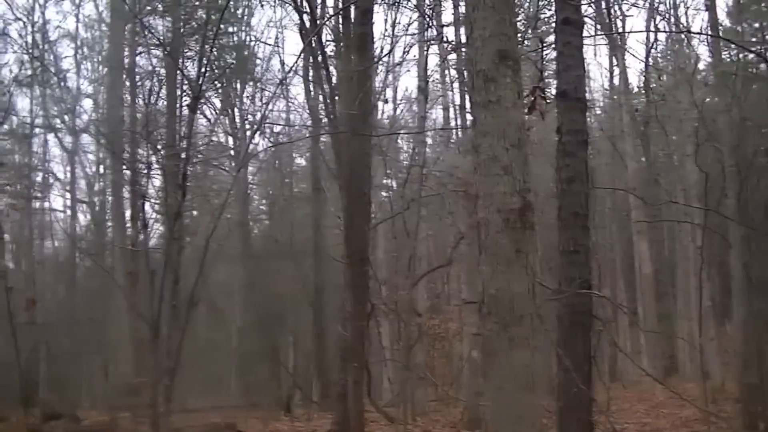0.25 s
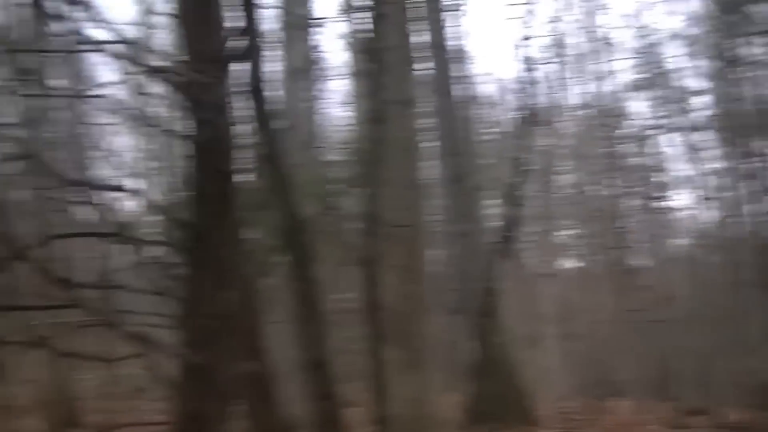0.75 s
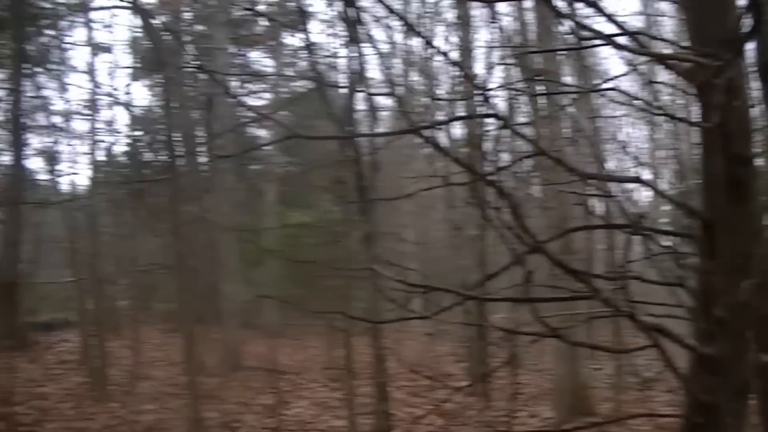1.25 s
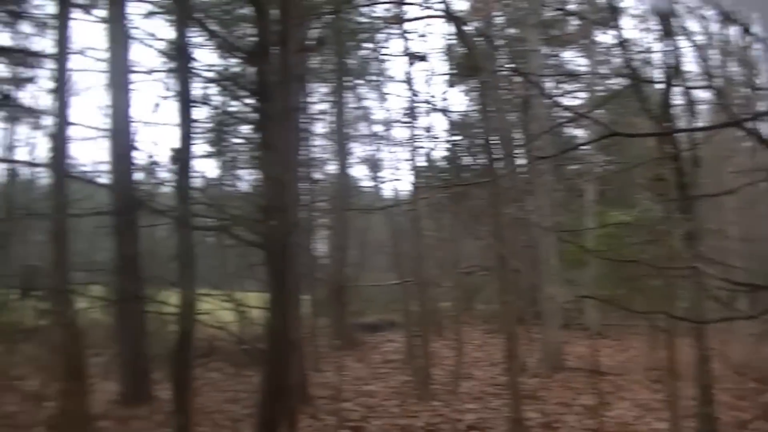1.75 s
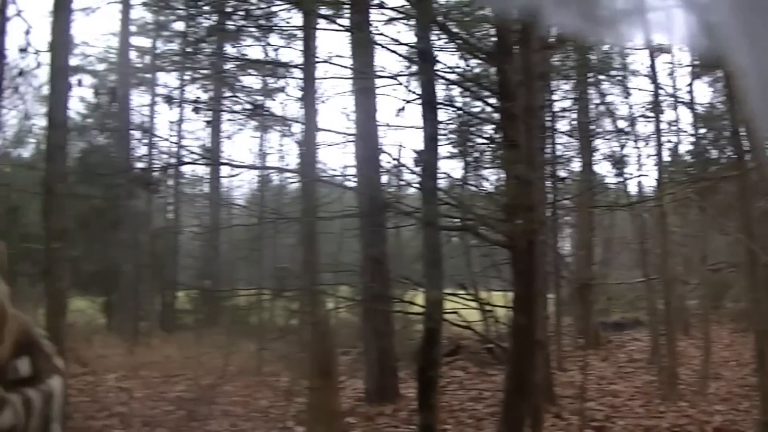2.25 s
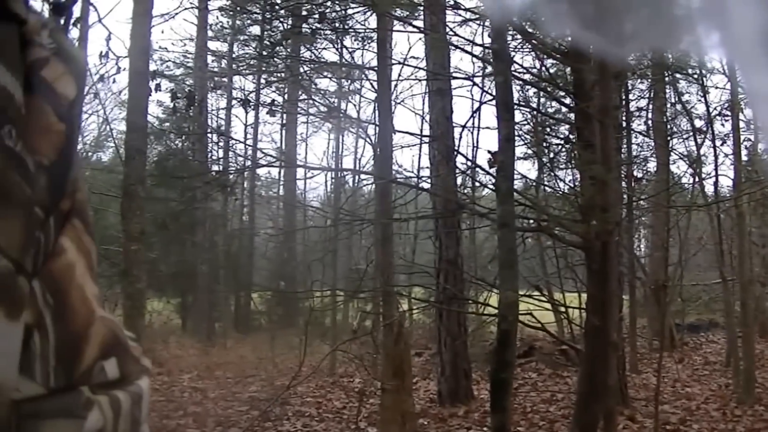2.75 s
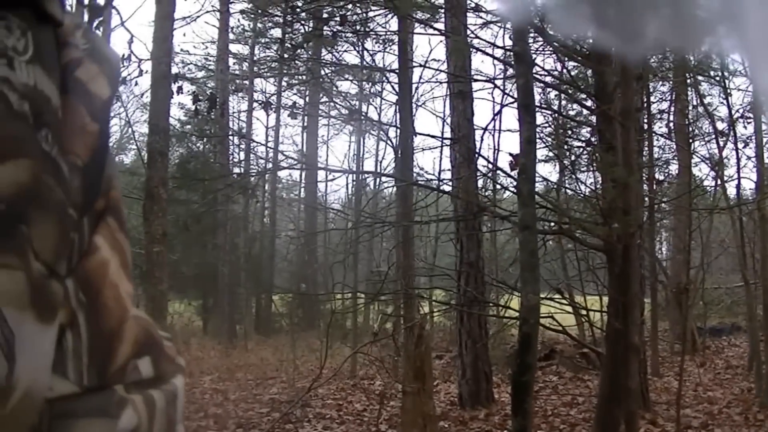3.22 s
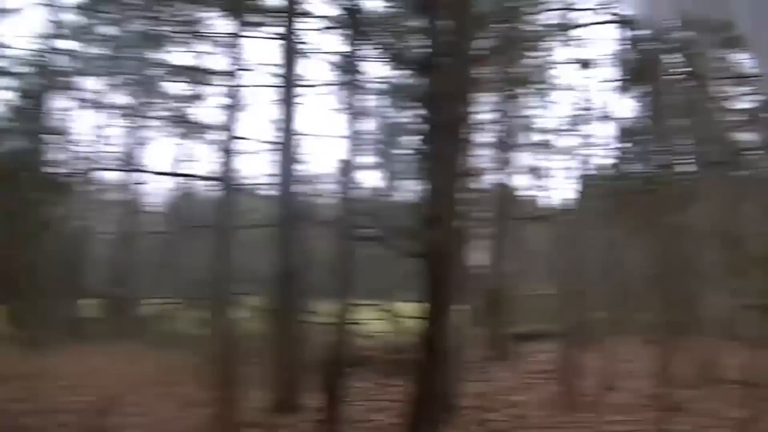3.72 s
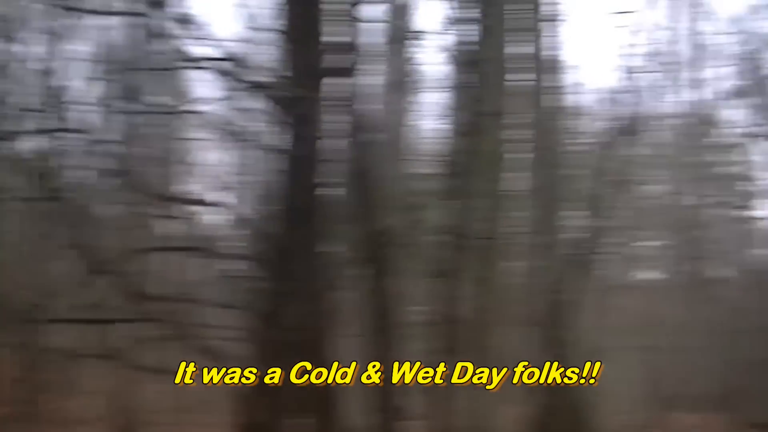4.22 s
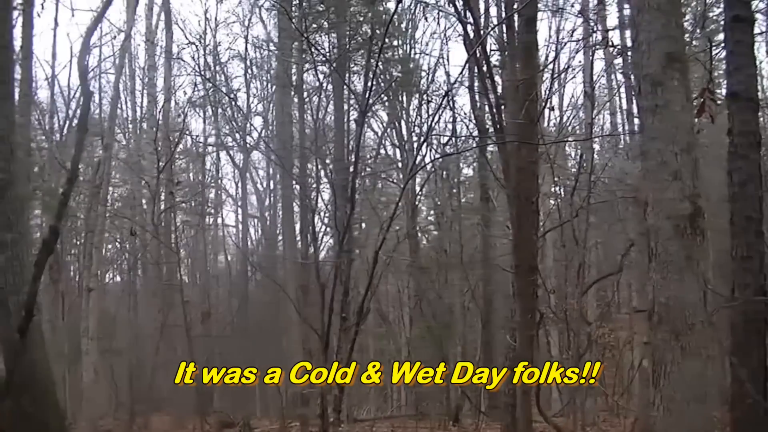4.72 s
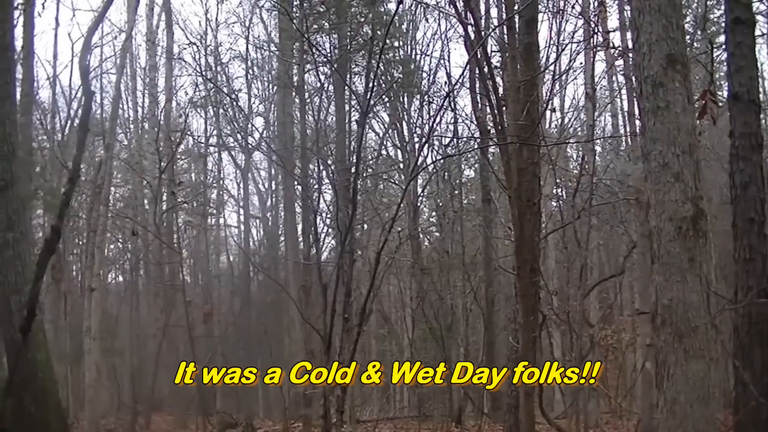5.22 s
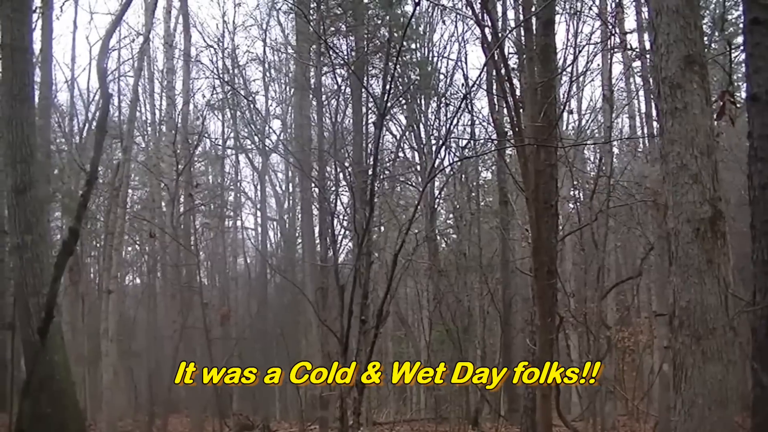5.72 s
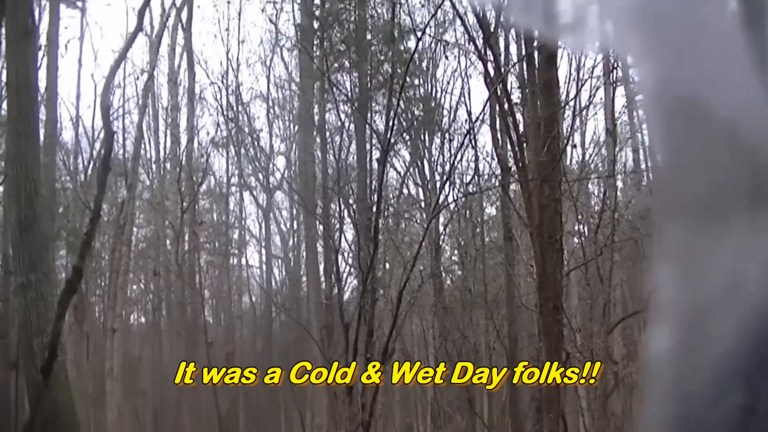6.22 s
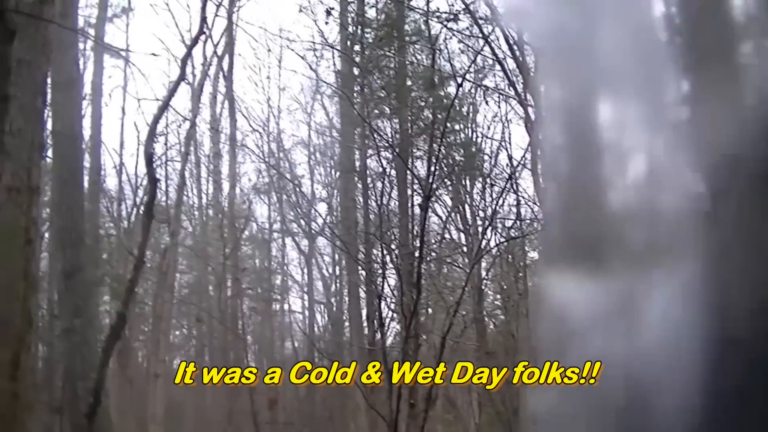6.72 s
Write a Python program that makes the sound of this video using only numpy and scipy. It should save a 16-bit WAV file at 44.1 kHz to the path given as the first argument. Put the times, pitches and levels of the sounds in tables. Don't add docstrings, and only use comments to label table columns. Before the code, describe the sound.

Very close, dry plastic handling noise in stereo: bright millisecond snaps, duller knocks, hollow dents and low bumps that shake the camera body. It clusters early, eases, flares again in the middle, leaves a quiet gap with one sharp tick, and ends in heavy crackling. Faint drizzle and a slight echo among trees lie behind.

```python
import sys
import numpy as np
from scipy import signal
from scipy.fft import rfft, irfft, next_fast_len
from scipy.io import wavfile

SR = 44100
rng = np.random.default_rng(int(sys.argv[2]) if len(sys.argv) > 2 else 0)


def wrap_up_sound(samples):
    columns = np.atleast_2d(samples).T
    tamed = np.clip(columns, -1, 1)
    steps = np.round(tamed * 32767).astype(np.int16)
    wavfile.write(sys.argv[1], SR, steps)


N = 306936

# frequency in Hz, level in dB per Hz.
WOOD_SPECTRUM = [(35, -16), (125, 0), (500, -8), (2000, -15), (4200, -17), (8000, -23), (13000, -26),
                 (16500, -34)]
# time in seconds, level in dB.
SWIVEL_LEVEL = [(.9, -76), (1.3, -61), (1.9, -71), (3.75, -80), (3.9, -53), (4.15, -58), (4.5, -76)]
# centre in seconds, length in seconds, level in dB.
SWISHES = [
    (5.019, 0.011, -47),
    (5.765, 0.032, -46.5),
    (6.245, 0.031, -32),
    (4.278, 0.011, -30.5),
]
# time in seconds, pressure in dB, sliding in dB, shaking in dB.
HAND = [(0.0, -57, -53, -42), (0.11, -47, -47, -47), (0.27, -57.5, -57.5, -47), (0.39, -28.5, -57, -22.5),
        (0.7, -34.5, -45, -26.5), (0.87, -45.5, -51, -36.5), (1.5, -45.5, -54, -41), (2.76, -57, -54, -59),
        (3.71, -48, -51.5, -43), (3.8, -40.5, -48.5, -36.5), (4.3, -35.5, -43, -30),
        (4.6, -43.5, -52, -31.5), (4.85, -59, -55.5, -47.5), (5.82, -51, -57.5, -47),
        (5.96, -30.5, -39.5, -18.5), (6.41, -41, -47, -47), (6.48, -32.5, -36, -25),
        (6.96, -39.5, -42.5, -36.5)]
# start in seconds, peak in dB, pitch in Hz.
JOLTS = [(0.5067, -25, 110.0), (0.6319, -30, 131), (0.7596, -28, 120.0), (3.0865, -20.5, 120),
         (3.5815, -24.5, 132), (3.8583, -32, 109), (4.0578, -28, 110.0), (4.166, -17, 111),
         (4.183, -19.5, 84.5), (4.24, -27, 89), (4.5163, -23.5, 120.0), (5.365, -30.5, 115),
         (5.2764, -33, 122), (5.3972, -24.5, 98), (6.0234, -23, 124), (6.7512, -32, 110.0)]
# start in seconds, peak in dB, pitch in Hz.
PALM_DENTS = [(0.0926, -25, 264), (0.3678, -19, 272), (0.6209, -21, 270.0), (0.7973, -23, 308),
              (0.8742, -17.5, 388), (0.9968, -20.5, 450.0), (1.2205, -14, 320), (1.3888, -31, 360.0),
              (1.6002, -24, 198), (1.6161, -23, 422), (1.8819, -19.5, 286), (2.825, -25.5, 355),
              (3.4303, -24, 500), (3.4754, -22, 464), (3.8039, -22, 260.0), (3.8451, -14, 231),
              (3.9301, -18.5, 460.0), (4.0528, -10.5, 358), (4.3138, -21, 393), (4.3368, -25, 248),
              (4.6049, -25.5, 360.0), (4.639, -19, 260.0), (5.0883, -26, 360), (5.1708, -31.5, 250.0),
              (5.3955, -29, 252), (5.9412, -23, 388), (6.0343, -14, 313), (6.0504, -11.5, 276),
              (6.1066, -18, 300.0), (6.1661, -5.5, 390), (6.1801, -16, 313), (6.2483, -20, 360.0),
              (6.3258, -25, 318), (6.5895, -17.5, 260), (6.6201, -18, 290), (4.451, -18.5, 400),
              (6.699, -24, 220.0), (6.7132, -25.5, 300.0), (6.7318, -21, 247), (6.7443, -22, 270.0),
              (6.7808, -25, 220.0), (6.9231, -16.5, 453), (6.9458, -23, 220.0), (3.255, -32, 292),
              (0.753, -18.5, 290), (4.528, -20, 302), (0.336, -25, 560)]
# start in seconds, peak in dB, pitch in Hz.
FINGER_TAPS = [(0.4347, -14, 780), (0.4525, -18, 770), (0.623, -24, 870), (0.666, -25, 700),
               (0.7037, -22, 740), (0.7922, -27, 670), (0.8223, -26, 780), (0.8585, -18, 683),
               (1.1224, -18.5, 830), (1.1887, -24, 770), (1.5222, -29.5, 960), (1.6577, -27, 870),
               (2.38, -28, 1230), (3.0549, -28, 820), (3.4734, -17.5, 1500), (3.6455, -14.5, 1000),
               (3.9, -20, 826), (3.9391, -17.5, 870), (4.0904, -25, 1060), (4.1435, -21, 1140),
               (4.2976, -22.0, 850), (4.3119, -17.5, 920), (4.816, -32, 720), (5.9984, -20, 1080),
               (6.0411, -18, 615), (6.0485, -15.5, 950), (6.0788, -14, 670), (6.1055, -16, 780),
               (6.223, -19, 1140), (6.3471, -22, 1160), (6.3545, -21, 795), (6.4283, -19.5, 720),
               (6.4585, -15, 930), (6.4651, -18, 760), (6.537, -20, 1060), (6.6029, -23, 850),
               (6.6099, -22.0, 1100), (6.6872, -27.0, 970), (6.7799, -23.5, 775), (6.9222, -17, 670)]
# start in seconds, peak in dB, pitch in Hz.
NUDGES = [(0.064, -22, 180), (3.106, -35.5, 600), (5.341, -36, 298), (0.805, -21, 227), (0.852, -35, 374),
          (1.061, -24, 199), (1.122, -20.5, 243), (1.425, -23, 203), (1.259, -30, 550), (1.786, -24.5, 462),
          (2.181, -21.5, 250), (2.24, -24, 255), (2.27, -20.5, 187), (2.45, -25, 385), (2.577, -23, 171),
          (2.857, -21.5, 570), (2.876, -28, 620), (2.921, -29, 203), (3.668, -22, 496), (4.21, -24.5, 160),
          (4.282, -20, 534), (4.388, -19, 333), (4.502, -22.5, 337), (4.637, -33, 197), (5.258, -31, 190),
          (5.378, -23.5, 330), (6.223, -18, 302), (6.244, -23, 360), (6.855, -19.5, 483),
          (6.895, -18.5, 353)]
# start in seconds, peak in dB, pitch in Hz, length in milliseconds.
THUMPS = [(0.138, -21, 225, 16.5), (0.381, -13, 227, 40), (0.422, -13.5, 255, 69), (0.505, -16, 298, 57),
          (0.546, -8, 422, 19), (0.629, -12, 320, 18), (0.681, -14.5, 410, 67), (0.932, -19, 346, 11.5),
          (1.164, -19.5, 165, 26), (1.22, -28, 300, 4.5), (1.63, -18.5, 417, 11), (1.848, -17, 200, 17),
          (3.07, -10, 415, 10.4), (3.272, -15, 240, 8), (3.571, -17.5, 326, 12), (3.746, -15.5, 350, 14),
          (3.815, -15.5, 390, 65), (4.05, -20.5, 320, 5.2), (4.155, -9.5, 225, 7.6), (4.661, -20, 253, 13),
          (5.904, -16.5, 189, 33), (5.981, -16.5, 256, 94), (6.067, -9.5, 287, 57), (6.119, -8, 294, 18),
          (6.163, -6, 370, 9), (6.366, -9, 374, 6.3), (6.434, -15, 295, 4.1), (6.477, -5.5, 493, 4.6),
          (6.508, -14.5, 250, 38), (6.613, -26, 236, 28)]
# frequency in Hz, T60 in seconds, level in dB.
HOUSING_MODES = [(100.4, 0.3, -3.5), (132, 0.074, -0.5), (250, 0.078, -4)]
# start in seconds, peak in dB, ring in Hz.
CRACKLES = [(0.3604, -28, 6970.0), (0.519, -23, 3650.0), (0.615, -19, 2350), (0.6389, -26, 4650.0),
            (0.6996, -21, 5500), (0.763, -18.5, 1980), (0.976, -25, 6100), (1.147, -29, 5890.0),
            (1.2061, -29, 3930.0), (1.7459, -28.5, 3470), (1.7867, -24.5, 4730), (2.016, -22, 5670),
            (2.189, -29.5, 7600), (3.0741, -14, 4520.0), (3.4054, -26, 3550.0), (0.293, -35, 3200),
            (3.6445, -17, 6200.0), (3.77, -13, 3500.0), (3.7804, -17, 4600), (3.8398, -24.0, 2080.0),
            (3.9, -27, 2370.0), (4.0846, -27, 2920.0), (4.1505, -23, 4850.0), (4.1609, -21, 3150.0),
            (4.283, -16, 4670), (4.3387, -16, 4100), (4.4178, -26, 3110.0), (4.449, -21.5, 5760),
            (5.9137, -28, 2690.0), (5.9781, -31, 4900.0), (5.9846, -26, 2950), (6.0417, -18.5, 2500),
            (6.0635, -11, 5940), (6.0702, -18, 5230.0), (6.1232, -16, 3960), (6.149, -13, 5210.0),
            (6.1845, -27, 3160), (6.2245, -18.5, 3680), (6.238, -23.0, 3990.0), (6.3532, -18, 4450.0),
            (6.4266, -29, 3180.0), (6.561, -21.0, 3730.0), (6.603, -20, 5870.0), (6.6096, -27, 3160.0),
            (6.6438, -14.5, 3620.0), (6.6664, -18, 8060.0), (6.695, -23, 5290.0), (6.721, -18, 8450.0),
            (6.7383, -26, 5080.0), (6.774, -25, 3980.0), (6.9145, -21, 3720), (6.946, -31, 3760.0)]
# start in seconds, body in dB, knock in Hz, ring in dB over the body.
KNOCKS = [(0.491, -13, 770, 0), (0.653, -24, 1540, 8), (0.857, -13.5, 600, -13), (0.919, -19.5, 750, -3),
          (0.985, -18.5, 1270, -6), (1.45, -23, 1410, 6), (1.593, -18.5, 836, -0.5), (1.629, -19, 622, -11),
          (1.785, -21.5, 930, -25), (1.885, -12.5, 1130, -15), (2.966, -14.5, 1440, -10),
          (3.371, -33, 1040, 7.5), (3.499, -20, 1380, 0), (3.519, -18, 880, -14), (3.569, -7.5, 600, -6),
          (3.644, -20, 1280, -15), (3.772, -19, 597, -12), (3.787, -14, 1050, -3), (3.846, -7, 594, -15),
          (3.874, -16.5, 1310, -4), (4.072, -16, 980, 1.5), (4.214, -18, 1160, -4.5),
          (4.433, -15.5, 1044, -6), (4.658, -23, 680, 5.5), (4.828, -6, 1290, -11.5),
          (5.639, -27.5, 1320, 7), (5.723, -25, 1300, -3.5), (6.106, -15, 760, -0.5),
          (6.119, -7.5, 635, -3), (6.366, -8.5, 695, -11)]
# start in seconds, peak in dB, ring in Hz.
TICKS = [(0.4516, -10.5, 2880), (0.5262, -11.5, 2160), (0.5482, -10, 2090), (0.6224, -15, 5600),
         (1.8357, -20, 3540), (2.8582, -23, 3240), (2.8788, -20.5, 3250), (3.0537, -12, 4970),
         (3.272, -18, 2020), (3.4735, -13, 2500), (3.483, -17, 3020), (3.5349, -10.5, 4100),
         (3.913, -21, 4400), (3.9885, -18, 2950), (4.268, -13.5, 3130), (4.7604, 0, 6800),
         (5.912, -25, 2630), (6.121, -20, 3780), (6.128, -19, 3900), (6.157, -9.5, 5530),
         (6.5054, -14, 3500), (6.5495, -15, 4430), (6.7084, -7.5, 3600), (0.275, -28, 5060),
         (0.342, -25, 5200), (0.6664, -18, 6000), (0.807, -22, 1920), (1.187, -27, 2170),
         (6.459, -26, 2390), (6.5749, -20, 4450)]
# start in seconds, peak in dB, ring in Hz, body in dB.
POPS = [(0.384, -3, 4960, 3), (0.405, -20, 2600, -2), (0.5518, -11.5, 7300, -1), (0.6817, -1, 4440, 3),
        (0.6907, -7, 7650, -0.5), (0.7352, -10.5, 4150, -2.5), (0.9946, -12.5, 4470, -5),
        (1.615, -14.5, 3840, -7), (1.8806, -17, 4160, -6.5), (2.27, -14, 3700, -16),
        (2.8215, -8.5, 4530, -15), (3.0696, -7.5, 5640, -21), (3.166, -26, 3800, -11.5),
        (3.1722, -16.5, 5200, -20), (3.241, -15, 3740, -25), (3.429, -7.5, 4400, -6),
        (3.69, -18, 5170, -11.5), (3.7433, -9.5, 3270, -15), (3.814, -13, 4900, -1.5),
        (3.9191, -6.5, 4500, -9), (4.156, -11.5, 2780, -27), (4.3326, -10, 3660, -3),
        (4.6612, -12, 3420, -3), (5.087, -28.5, 6240, -9), (5.859, -27, 3170, -18), (6.1649, -8.5, 2320, 0),
        (6.4337, -14.5, 2320, 0), (6.4787, -20, 2370, -17), (6.4842, -6.5, 3500, -4), (6.64, -14, 5530, -6)]
# start in seconds, peak in dB, ring in Hz, top in dB.
CRACKS = [(0.1376, -13.5, 4800, -19), (0.307, -19.5, 3200, -10), (0.393, -2.5, 7160, 6),
          (0.4201, -3.5, 7000, 9), (0.4342, -4, 8100, 11), (0.629, -4, 8700, 6), (0.777, -25, 5950, -24),
          (0.97, -22, 5500, -12), (1.2175, -18, 3350, -16), (1.5506, -15.5, 5930, -1.5),
          (1.986, -17, 3750, -10), (2.2466, -14.5, 3570, -4.5), (2.5766, -18, 2600, -23),
          (2.9732, -12, 6900, -6), (3.0251, -20, 6360, -12), (3.0478, -2.5, 6760, 10.5),
          (3.6307, -10.5, 4940, -7.5), (4.018, -2, 8640, 10), (4.31, -23, 2870, -28),
          (5.893, -22, 3500, -15), (6.0005, -10, 5430, -17), (6.0484, -6, 4640, -1),
          (6.245, -12, 5130, -10), (6.537, -7.5, 3600, -4), (6.593, -13, 3580, -22),
          (6.651, -10.5, 6700, -5), (6.7457, -6.5, 6230, 6), (6.839, -14, 4540, -15),
          (6.8542, -7.5, 8200, -3), (6.8964, -8.5, 6250, 5)]
# frequency in Hz, width in Hz, gain in dB.
PORT_CAVITIES = [(3500, 760, 2), (6360, 620, 1), (4460, 1000, -2.5)]
# frequency in Hz, lead of the left one in radians.
LEFT_LEAD = [(60, .15), (110, .45), (165, .8), (280, .25), (600, -.15), (2500, 0)]

WOOD_DB = -50.5
GROUND_S, GROUND_DB = 0.0081, -32.5
TRUNKS_DB, TRUNKS_T60_S = -41.5, 0.34
NUDGE_CYCLES = 5.2
BUILD_S, SETTLE_S = .004, .018
STIR_RUMBLE_DB, STIR_FLUTTER_DB, STIR_RUSTLE_DB = -14, -25, -31.5
RUMBLE_DB_PER_OCTAVE = -10.5
RUB_CLUMPING = 1.2
DENT_RISE_CYCLES, DENT_FALL_CYCLES, DENT_SAG = 0.45, 0.8, 0.12
CRACK_BODY_DB, TICK_BODY_DB = -9, -28
POP_TOP_DB, TICK_TOP_DB, KNOCK_TOP_DB = 6.5, -43.5, -24.5
TOP_DB_PER_OCTAVE = 7
KNOCK_BODY_DB, KNOCK_RING_RATIO = 10.5, 2.81
BODY_HZ = 1425


def from_db(db):
    return 10 ** (np.asarray(db) / 20)


def rms_one(x):
    return x / np.sqrt(np.mean(x ** 2) + 1e-20)


def peak_one(x):
    return x / (np.max(np.abs(x), axis=-1, keepdims=True) + 1e-20)


def in_time(rows):
    s, *columns = np.transpose(rows)
    return [np.interp(np.arange(N) / SR, s, c) for c in columns]


def band(x, low_hz, high_hz):
    return signal.sosfilt(signal.butter(2, [low_hz, min(high_hz, .45 * SR)], "band", fs=SR, output="sos"), x)


def lay(times, shapes):
    out = np.zeros((2, N + shapes.shape[-1]))
    for s, shape in zip(times, shapes):
        at = max(round(s * SR), 0)
        out[:, at:at + shape.shape[-1]] += shape
    return out[:, :N]


def lumps(rate, depth_db):
    r = np.exp(-2 * np.pi * rate / SR)
    slow = signal.lfilter([1], [1, -2 * r, r * r], rng.standard_normal(N + SR))[SR:]
    return from_db(depth_db * rms_one(slow))


def widen(mid, side, alike):
    alike = np.clip(alike, 0, 1)
    return (np.sqrt(1 + alike) * mid + np.sqrt(1 - alike) * side * np.array([[1], [-1]])) / np.sqrt(2)


def grains(per_s, spread_db):
    sizes = from_db(spread_db * np.minimum(rng.exponential(1, (2, N)), 3))
    sizes = sizes * rng.choice([-1, 1], (2, N))
    return sizes * (rng.random((2, N)) < per_s / SR) + 1e-18


def wood():
    out = 0
    edges = 25 * 2 ** np.arange(0, 9.6, .5)
    hz, db = np.transpose(WOOD_SPECTRUM)
    white = rng.standard_normal((2, 2, N))
    for k, (low, high) in enumerate(zip(edges, edges[1:])):
        centre = np.sqrt(low * high)
        gain = from_db(np.interp(np.log(centre), np.log(hz), db))
        out = out + gain * widen(*band(white[k % 2], low, high), 1 / (1 + centre / 900))
    return from_db(WOOD_DB) * rms_one(out)


def swivel():
    level_db, = in_time(SWIVEL_LEVEL)
    hiss = rms_one(band(rng.standard_normal(N), 8000, 8700))
    return from_db(level_db) * lumps(20, depth_db=2.5) * hiss


def swishes():
    t = np.arange(N) / SR
    shape = sum(from_db(db) * np.exp(-((t - s) / length_s) ** 2) for s, length_s, db in SWISHES)
    return shape * rms_one(band(rng.standard_normal((2, N)), 2600, 4100))


def all_buckles():
    return THUMPS + [(s, db, hz, 1000 * NUDGE_CYCLES / hz) for s, db, hz in NUDGES]


def buckle(hz, length_s, noise):
    size = noise.shape[-1]
    t = np.arange(size) / SR
    f = np.maximum(np.fft.rfftfreq(size, 1 / SR), 30)
    push = noise * from_db(-14 * t / length_s)
    push[:, :1] += 5.45 * np.sqrt(length_s * SR / 100)
    colour = 1 / (1 + (f / (0.73 * hz)) ** 1.96) / (1 + (0.68 * hz / f) ** 3.36)
    lag_phase = 2 * np.pi * 1.3075 * np.log(f / 4000) * (f < 4000)
    return irfft(rfft(push) * colour * np.exp(-1j * lag_phase), size)


def unrest(steady_db, stir_db, db_per_octave, late_s):
    s, db, hz, _ = np.array(all_buckles()).T[:, :, None]
    s, t = s + late_s, np.linspace(0, N / SR, num=3000)
    swell = np.exp(np.minimum((t - s) / BUILD_S, (s - t) / SETTLE_S))
    swell_db = db + stir_db + db_per_octave * np.log2(hz / 250)
    power = np.sum(from_db(2 * swell_db) * swell, axis=0)
    return 10 * np.log10(from_db(2 * steady_db) + np.interp(np.arange(N) / SR, t, power))


def handling():
    pressure_db, sliding_db, shaking_db = in_time(HAND)
    rumble_db = unrest(shaking_db, STIR_RUMBLE_DB, RUMBLE_DB_PER_OCTAVE, late_s=0.003)
    rustle_db = unrest(sliding_db + 2.0, STIR_RUSTLE_DB, 1.7, late_s=0.0021)
    flutter_db = unrest(pressure_db, STIR_FLUTTER_DB, 0, late_s=0.003)
    rustle_db = rustle_db - 10 / (1 + from_db(2 * (rustle_db + 54)))
    clumps = np.minimum(lumps(28.8, depth_db=6.0), 2.2)
    rumble = band(rng.standard_normal((2, N)), 64.0, 157.0) * lumps(20.0, depth_db=2.5)
    small = buckle(np.geomspace(180, 620, num=6)[:, None], 0.0053, rng.standard_normal((6, 2048)))
    flutter = sum(signal.fftconvolve(grains(110, spread_db=3.05), shape[None], axes=1)[:, :N]
                  for shape in small)
    flutter = band(flutter, 168, 1330)
    edges = np.geomspace(900, 16000, num=6)
    cracks = sum(band(grains(150, spread_db=15.0), low_hz, 0.77 * high_hz) * (1000 / low_hz) ** 0.5
                 for low_hz, high_hz in zip(edges, edges[1:]))
    rub = band(signal.lfilter([1], [1, -.5], rng.standard_normal((2, N))), 1030, 15600)
    layers = [(rumble_db - 5.5, widen(*rumble, 1.0)),
              (flutter_db + 1.0, widen(*flutter, 0.55) * clumps ** 0.48 * from_db([[.8], [-.8]])),
              (rustle_db - 3.5, widen(*cracks, 0.77) * clumps),
              (rustle_db - 0.5, widen(*rub, 0.95) * clumps ** RUB_CLUMPING)]
    return sum(from_db(db) * rms_one(x) for db, x in layers)


def dents(rows, gain_db, rough, apart):
    s, peak_db, hz = np.array(rows).T[:, :, None, None]
    draw = rng.standard_normal((len(s), 1, 4096 + 3))
    phase, lean, offset, noise = draw[..., :1], draw[..., 1:2], draw[..., 2:3], draw[..., 3:]
    cycles, sides = np.arange(4096) / SR * hz, np.array([[.5], [-.5]])
    rise = cycles / DENT_RISE_CYCLES
    swell = rise * np.exp(-rise) + .5 * np.tanh(rise) * np.exp(-cycles / DENT_FALL_CYCLES)
    sagging = cycles ** (1 - DENT_SAG) * 1.144
    swing = np.sin(2 * np.pi * (sagging + phase) + apart * offset * sides)
    edge = peak_one(band(noise, 500, 2800)) * np.exp(-cycles / 0.49)
    shape = peak_one(swell * (swing + rough * edge)) * from_db(peak_db + gain_db)
    return lay(s.ravel() - 0.53 / hz.ravel(), shape * from_db(2.9 * apart * (lean + 0.9) * sides))


def thumps():
    s, peak_db, hz, length_ms = np.array(all_buckles()).T[:, :, None]
    noise = rng.standard_normal((len(s), 2, 4096))
    length_s = np.clip(0.94 * length_ms / 1000 - .003, .001, .04)
    mid = peak_one(buckle(hz, length_s, noise[:, 0]))
    side = from_db(-15.0) * peak_one(band(buckle(hz, 27.0 * length_s, noise[:, 1]), 183, 2600))
    both = np.stack([(mid + side) * from_db(2.5), (mid - side) * from_db(2.57)], axis=1)
    return lay(s[:, 0] - .0008, both * from_db(peak_db - 0.6)[:, None])


def housing(x):
    out = 0
    push = x.mean(axis=0) + 1e-18
    for hz, t60_s, db in HOUSING_MODES:
        r, w = from_db(-60 / (t60_s * SR)), 2 * np.pi * hz / SR
        hum = signal.lfilter([2 * (1 - r) * np.sin(w)], [1, -2 * r * np.cos(w), r * r], push)
        out = out + from_db(db) * hum
    return out


def all_snaps():
    def top(db, hz, share_db):
        return db + share_db + TOP_DB_PER_OCTAVE * np.log2(hz / 4500)

    return ([(s, db, hz, db + CRACK_BODY_DB, top_db, BODY_HZ) for s, db, hz, top_db in CRACKS]
            + [(s, db, hz, body_db, top(db, hz, POP_TOP_DB), BODY_HZ) for s, db, hz, body_db in POPS]
            + [(s, db, hz, db + TICK_BODY_DB, db + TICK_TOP_DB, BODY_HZ) for s, db, hz in TICKS]
            + [(s, db + ring_db, KNOCK_RING_RATIO * hz, db + KNOCK_BODY_DB, db + ring_db + KNOCK_TOP_DB, hz)
               for s, db, hz, ring_db in KNOCKS])


def snaps(rows):
    s, peak_db, hz, body_db, top_db, body_hz = np.array(rows).T[:, :, None]
    t = np.arange(512) / SR
    noise, dice = rng.standard_normal((len(s), 3, 512)), rng.random((len(s), 3))

    def dying(t60):
        return (1 - np.exp(-t / 0.000051)) * from_db(-60 * t / t60)

    wobble = 0.12 * np.cumsum(noise[:, 0], axis=1) * np.sqrt(hz / SR)
    ring = np.sin(2 * np.pi * hz * t + wobble) * dying(0.00053 + 9 / hz)
    octaves = np.log2(np.maximum(np.fft.rfftfreq(512, 1 / SR), 100) / hz)
    crack = irfft(rfft(noise[:, 1]) * from_db(-7 * np.abs(octaves)))
    crack = band(crack * dying(0.0079), 770, 7660)
    top = band(noise[:, 2] * dying(.007), 9000, 14000)
    falling = body_hz * (.9 + .25 * dice[:, :1]) * t * (1 - 15 * t)
    knock = np.sin(2 * np.pi * falling + 2 * np.pi * dice[:, 1:2]) * dying(0.006)
    knock = knock * (1 - np.exp(-t / .00025))
    crack_db = 5.0 + 0.64 * np.clip(top_db - peak_db + 17.0, -30, 0)
    whole = from_db(peak_db) * peak_one(peak_one(ring) + from_db(crack_db) * peak_one(crack))
    whole += from_db(top_db - 13.5) * peak_one(top)
    whole += from_db(body_db - 13.5) * peak_one(knock)
    pan = from_db(3.2 * (dice[:, 2:] - 0.5)[:, None] * [[1], [-1]])
    return lay(s[:, 0] - .0001, whole[:, None] * pan)


def echoes(x):
    t = np.arange(round(.4 * SR)) / SR
    scatter = from_db(GROUND_DB - 60 * t / 0.0093) + from_db(TRUNKS_DB - 60 * t / TRUNKS_T60_S)
    answer = band(rng.standard_normal((2, len(t))) * scatter, 360, 6740)
    late = np.pad(answer, ((0, 0), (round(GROUND_S * SR), 0)))
    return signal.fftconvolve(x.mean(axis=0)[None], late, axes=1)[:, :N]


def capsules(x):
    size = next_fast_len(N + SR)
    hz, lead = np.transpose(LEFT_LEAD)
    turn = np.interp(np.log(np.fft.rfftfreq(size, 1 / SR) + 1), np.log(hz), lead)
    return irfft(rfft(x, size) * np.exp((0.076 + .5j) * turn * np.array([[1], [-1]])), size)[:, :N]


def scene():
    background = wood() + swivel() + swishes() + handling()
    small = dents(JOLTS, gain_db=1.0, rough=.05, apart=.1)
    small = small + dents(PALM_DENTS, gain_db=0.0, rough=0.49, apart=0.46)
    small = small + dents(FINGER_TAPS, gain_db=0.5, rough=0.41, apart=1.0)
    buckles = thumps()
    crackles = snaps([(s - .0003, db + 0.5, hz, db + 2, db - 8, BODY_HZ) for s, db, hz in CRACKLES])
    cracks = snaps(all_snaps())
    returns = echoes(crackles) + echoes(cracks)
    return background + small + buckles + housing(buckles + small) + crackles + cracks + returns


def top_cut(x):
    return signal.sosfilt(signal.butter(12, 16990, fs=SR, output="sos"), x)


def record(dry):
    x = signal.sosfilt(signal.butter(2, 68, "high", fs=SR, output="sos"), capsules(dry))
    for hz, width_hz, db in PORT_CAVITIES:
        x = x + (from_db(db) - 1) * signal.lfilter(*signal.iirpeak(hz, hz / width_hz, fs=SR), x)
    x = np.clip(x, -.8, .8)
    x = signal.sosfilt(signal.cheby2(12, 70, 16700, fs=SR, output="sos"), x)
    return top_cut(x)


dry = scene()
out = record(dry)
wrap_up_sound(out)
```